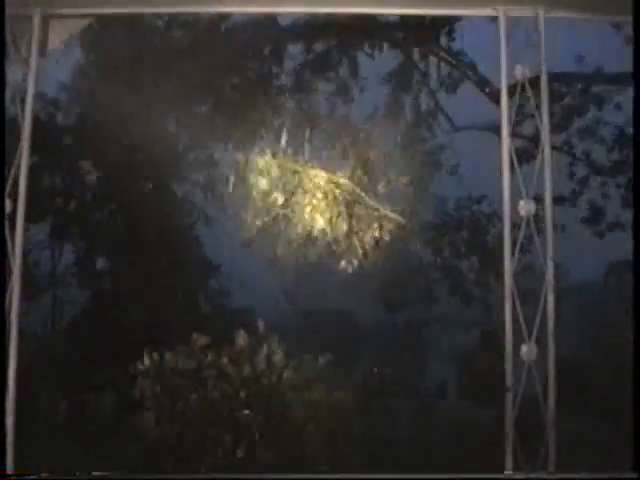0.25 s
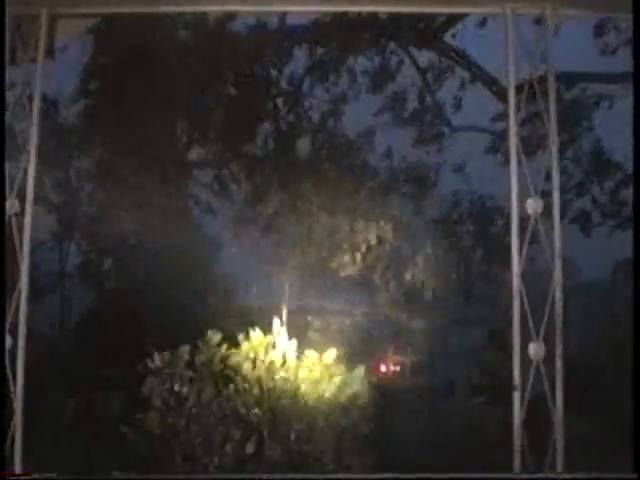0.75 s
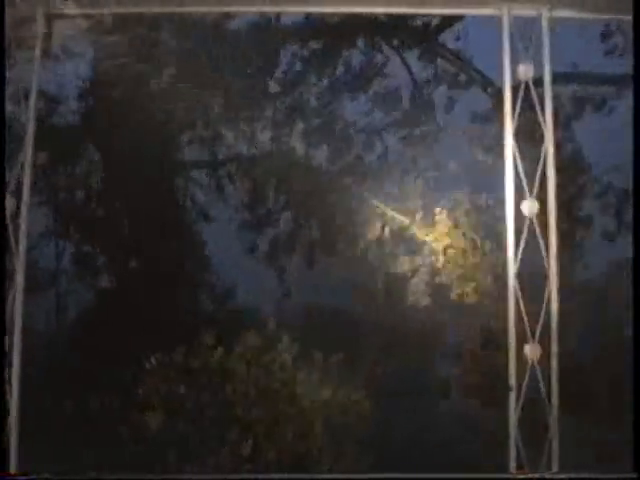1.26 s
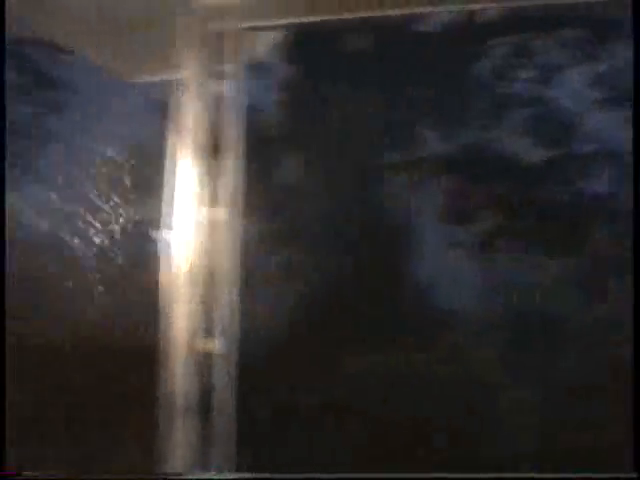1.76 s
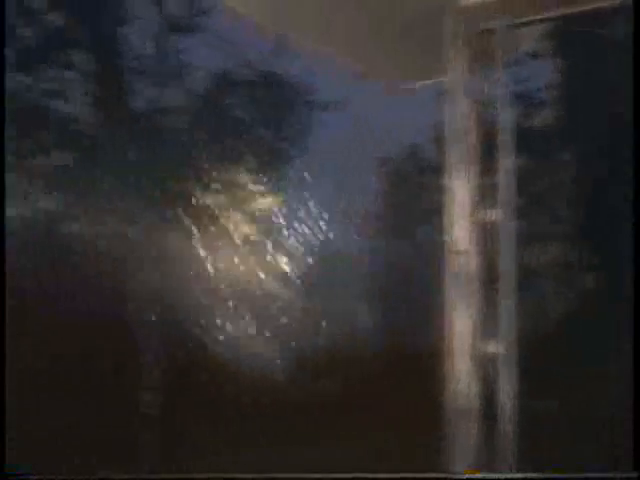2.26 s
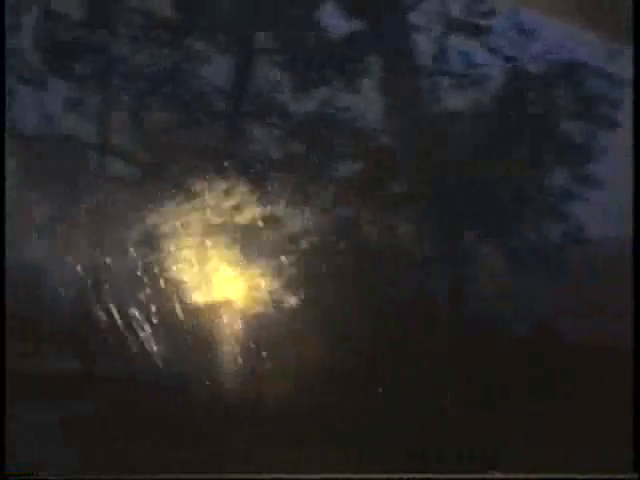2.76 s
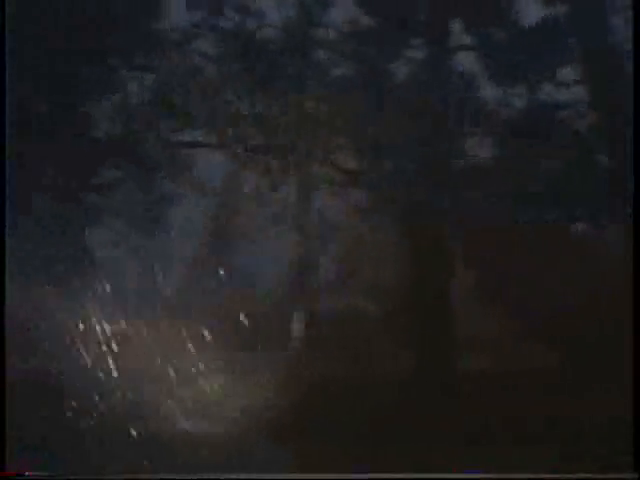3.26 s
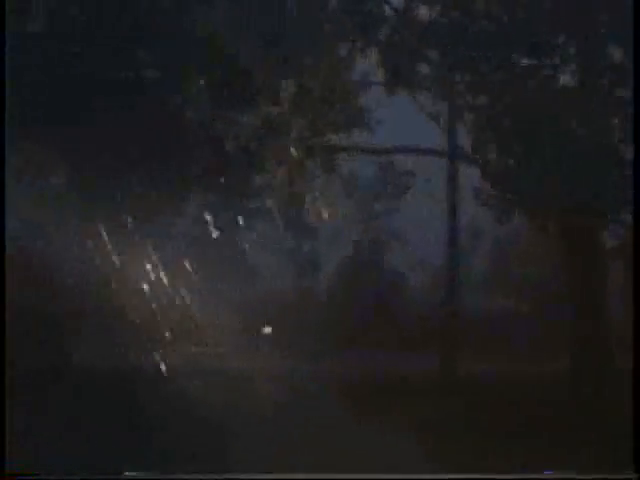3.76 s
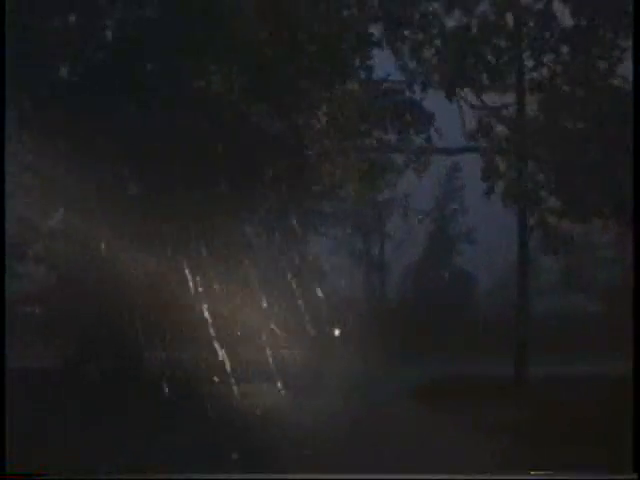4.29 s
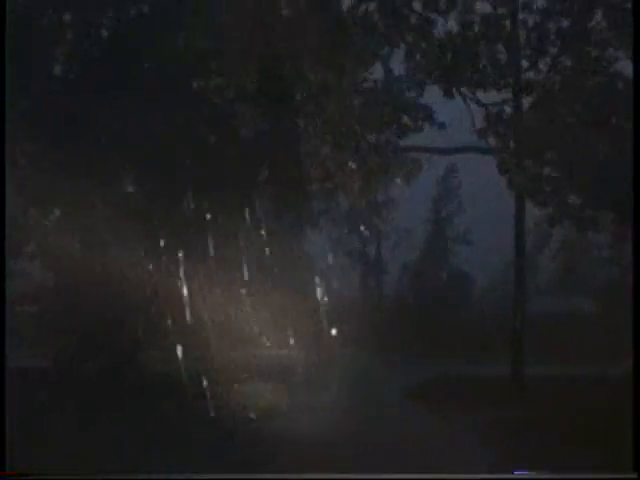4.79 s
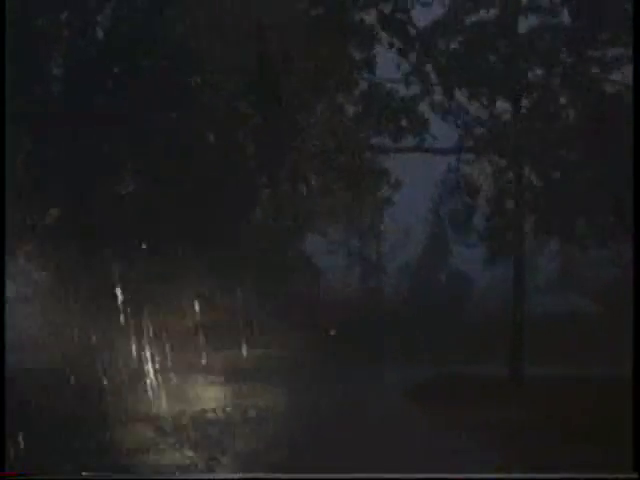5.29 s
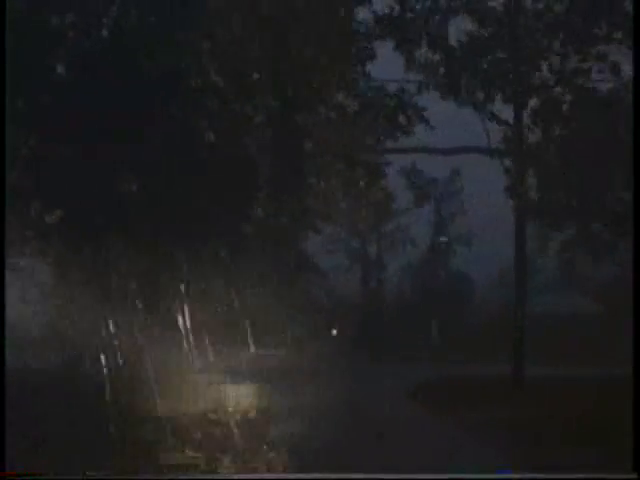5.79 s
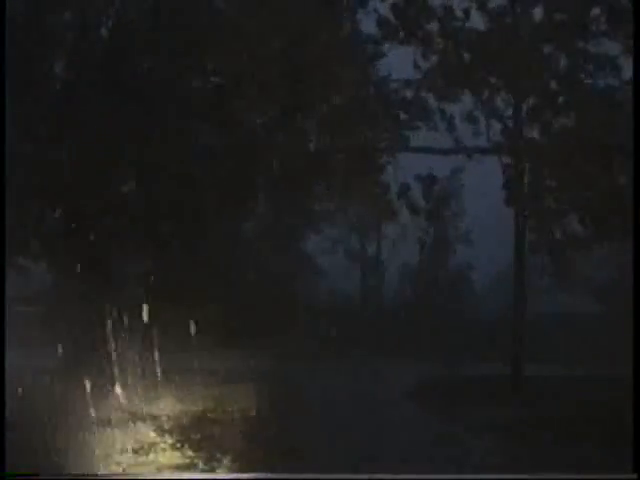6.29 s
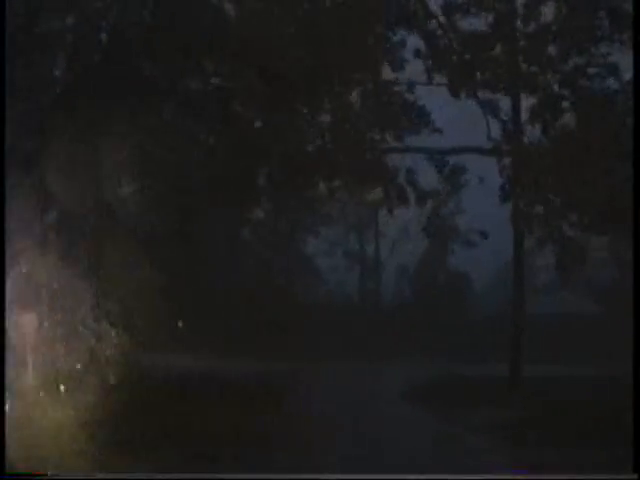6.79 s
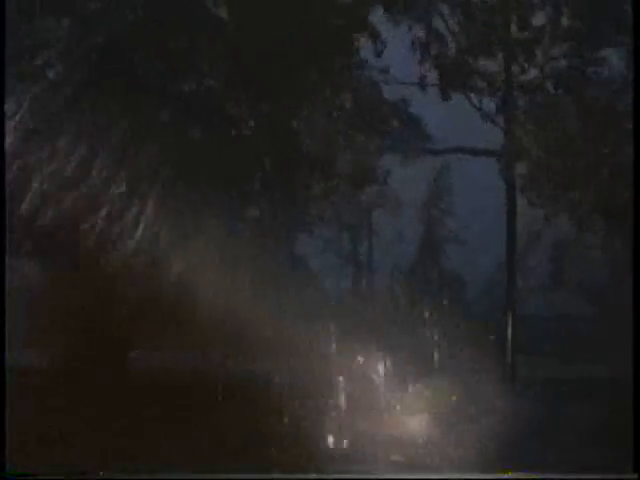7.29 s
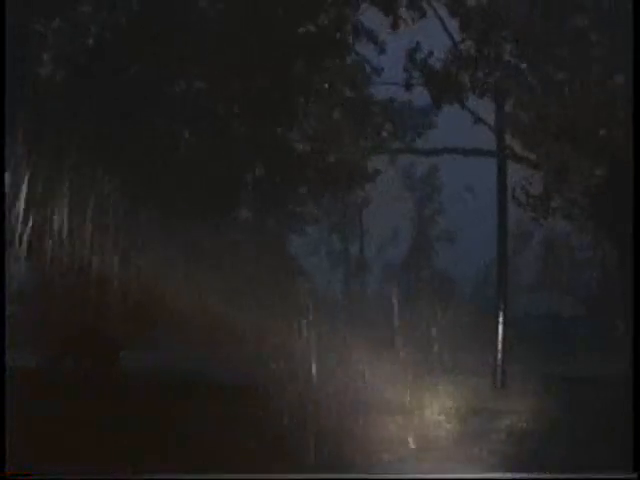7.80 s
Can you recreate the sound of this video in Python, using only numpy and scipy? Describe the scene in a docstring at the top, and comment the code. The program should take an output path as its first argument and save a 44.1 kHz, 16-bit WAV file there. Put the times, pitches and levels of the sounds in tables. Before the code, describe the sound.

Hurricane wind roars through trees while dense rain hisses steadily, with water spilling nearby, low wind thumps, one creak and two sharp drips.

```python
"""A hurricane at night, heard from under a porch roof that faces a yard and a road.
From the start wind roars and howls in the trees, leaves thrash, rain hisses and near drops spatter: all shaped noise,
but for ticking drops; eddies rumble and thump on two microphone ports. Early on, water spills from the roof edge.
The camera then creaks once, a sinking tone, as it turns to the road. The storm eases, two fat drips ring,
the level dips briefly three times, and wind and rain build again."""
import sys
import numpy as np
from scipy import signal
from scipy.fft import rfft, irfft, next_fast_len
from scipy.io import wavfile
from scipy.ndimage import uniform_filter1d, map_coordinates

SR = 44100
rng = np.random.default_rng(int(sys.argv[2]) if len(sys.argv) > 2 else 0)


def wav_out(sig):
    """Save sig, one row per channel (or a flat mono array), as 16-bit PCM at SR to the path in sys.argv[1]."""
    wavfile.write(sys.argv[1], SR, np.round(np.clip(np.atleast_2d(sig).T, -1, 1) * 32767).astype(np.int16))


N = 355005

# strength of the storm, which drives wind and rain alike: (time [s], level against full force [dB])
STORM_STRENGTH = [(0, -0.7), (.5, -0.15), (1.4, -0.04), (2.45, -0.1), (2.95, -0.5), (3.45, -0.45),
                  (3.7, -0.6), (4.25, -1.8), (4.6, -2), (5.2, -2.5), (5.72, -3), (5.95, -1.5), (6.4, -1.67),
                  (6.8, -1), (7.05, -0.5), (7.45, 0.13), (7.65, -0.5), (8.05, 0.44)]

# relative spectral density of each source: (frequency [Hz], level [dB per Hz])
ROAR_SPECTRUM = [(50, -16), (100, -9), (160, -2.3), (210, -2.5), (270, 1), (335, -1.5), (400, 0.4),
                 (470, -1.7), (540, -0.7), (700, -5), (1100, -15), (2500, -37), (6000, -69)]
LEAF_SPECTRUM = [(200, -33), (500, -6.5), (750, 0), (1000, 0.5), (1300, 0.5), (1800, -3.5), (2600, -8.5),
                 (4500, -22), (10000, -59)]
RAIN_SPECTRUM = [(500, -23), (1200, -10), (2000, -2.5), (2800, -1.5), (4000, -0.5), (5000, 0.5), (5700, 0),
                 (6400, -2.5), (7200, -5), (8100, -5.5), (8800, -10), (9500, -18), (10200, -26.5),
                 (11000, -77)]
DISTANT_SPECTRUM = [(15, -15), (35, -6), (65, -0.5), (100, -1.5), (160, 0.5), (250, -4), (400, -23),
                    (1200, -61)]
EDDY_SPECTRUM = [(10, -17), (22, -5), (40, -3), (65, 3), (100, -6), (140, 0), (200, -14), (320, -22),
                 (900, -69)]
SPLASH_SPECTRUM = [(700, -28), (1150, -11), (1400, 1), (1650, 3), (2000, 1), (2300, -12), (3500, -37)]

# correlation of each source between the two ports: (frequency [Hz], correlation [-1 to 1])
ROAR_CORRELATION = [(80, 0.93), (170, 0.53), (280, 0.52), (360, .33), (540, 0.68), (800, .1)]
LEAF_CORRELATION = [(750, -0.13), (1100, 0.055), (1700, 0.21)]
RAIN_CORRELATION = [(2000, 0.09), (4000, 0.13), (5200, 0.0047), (6000, -0.19), (6900, -0.4), (7900, -0.038),
                    (8900, -0.23), (9900, 0.061)]
DISTANT_CORRELATION = [(60, .85), (200, .65)]
EDDY_CORRELATION = [(50, -0.88)]
SPLASH_CORRELATION = [(1600, .3)]

# colour of the left port against the right: (frequency [Hz], left minus right [dB])
PORT_COLOUR = [(30, 7), (70, -1), (170, -3), (270, 0), (390, -3.5), (600, 0.5), (1100, -1), (1600, 0.1),
               (2500, -0.8), (4600, -2), (6000, -0.5), (7600, 1), (8400, -2.5), (9500, -10)]

# gusts that surge through the trees: (middle [s], length [s], rise [dB])
GUST_EVENTS = [(.3, 0.71, 0.5), (1.0, 0.137, 1), (2.02, .14, 1.5), (2.35, .3, .9), (2.92, .22, 0),
               (3.66, .18, 3.5), (4.0, 0.35, 1.5), (4.42, .4, 1), (4.95, .14, 1.5), (5.91, .16, 1),
               (6.72, .2, 0), (7.11, .14, 2), (7.46, .2, 1)]
# faint howls in the branches: (middle [s], length [s], level [dB], top pitch [Hz])
HOWL_EVENTS = [(.25, 0.603, -32.5, 450), (1.301, .6, -34.5, 551), (1.77, .16, -31, 585),
               (2.419, 0.398, -32, 551), (3.649, 0.217, -34, 541), (4.448, .55, -33, 551),
               (7.699, .5, -36.5, 579)]
# sheets of heavier rain that sweep past: (middle [s], length [s], rise [dB])
RAIN_SHEETS = [(.7, 0.15, 1.2), (1.25, .12, 0.7), (2.46, .26, 0.7), (3.57, 0.23, 1), (5.42, .14, 0.2),
               (6.22, .12, 0.1), (7.0, .16, 0.8), (7.5, .16, .9)]
# buffets of air that reach the ports: (middle [s], length [s], rise [dB])
BUFFET_EVENTS = [(.08, 0.44, 2.5), (2.33, .3, 4), (3.05, 0.7, 4), (3.66, .35, 2), (4.15, .6, 3),
                 (5.25, .25, 4), (5.95, .4, 1), (6.65, .6, 4.5)]
# single thumps of air on the ports: (middle [s], peak [dB], pitch at the middle [Hz])
THUMP_EVENTS = [(.085, -27, 65), (2.165, -18, 125), (2.31, -24, 80), (2.685, -22, 165), (2.937, -14, 68),
                (3.183, -19.5, 80), (3.66, -22, 55)]
# spills of water from the roof edge: (middle [s], length [s], level before panning [dB])
SPILL_EVENTS = [(.42, .2, -33), (.74, .4, -30), (1.059, .2, -27.5), (1.28, .16, -35)]
# fat drips that land close by: (start [s], peak [dB], pitch [Hz])
DRIP_EVENTS = [(4.7928, -15, 4300), (4.8002, -11, 4150)]
# brief dips in level: (start [s], depth [dB])
LEVEL_DIPS = [(5.545, 1.4), (6.335, 2.5), (7.59, 0.5)]

# level of each source at full force (dB), and the dB it moves for each dB of the storm
RAIN_DB, RAIN_GROWS = -17.5, 1.07
LEAF_DB, LEAF_GROWS = -23, 0.94
ROAR_DB, ROAR_GROWS = -24, 0.5
EDDY_DB, EDDY_GROWS = -34, .4
LEAF_GUST_SHARE = 0.22  # how much of a gust's rise the leaves take
HOWL_WIDTH_HZ, HOWL_BEND_OCTAVES = 90, .12
# the microphone swings from the yard to the road: middle and length of the turn (s)
TURN_S, TURN_LENGTH_S = 2.8, .6
# what the turn does to each source (dB), and the balance before and after it (left minus right, dB)
ROAD_ROAR_DB, ROAD_LEAF_DB, ROAD_EDDY_DB = -2, -0.8, -3
YARD_LEFT_DB, ROAD_LEFT_DB = 0.75, -0.4
# the creak: start and length (s), level of its main tone (dB), first and last pitch (Hz)
CREAK_S, CREAK_LENGTH_S = 2.661, .06
CREAK_DB, CREAK_FIRST_HZ, CREAK_LAST_HZ = -20, 436, 375
DIP_FALL_S = 0.017  # time to the bottom of a dip; it recovers a few times more slowly
TOP_HZ = 10700  # band limit


def amp(db):
    """Level: 20 dB is a tenfold ratio of amplitude."""
    return 10 ** (np.asarray(db) / 20)


def unit(x):
    """Normalisation: a signal divided by its root mean square has rms 1."""
    return x / np.sqrt(np.mean(x ** 2) + 1e-20)


def along(points, hz):
    """Logarithmic frequency scale: values between given points are interpolated in log frequency."""
    f, v = np.transpose(points)
    return np.interp(np.log(hz + 1), np.log(f + 1), v)


def curves(rows):
    """Linear interpolation: one value per sample for each column after the time."""
    s, *columns = np.transpose(rows)
    return [np.interp(np.arange(N) / SR, s, column) for column in columns]


def wobble(rate):
    """Slow random modulation: a smooth curve for each port through random knots, rate knots a second."""
    place = np.arange(N) * rate / SR
    knot_count = int(place[-1]) + 4
    return np.array([map_coordinates(rng.standard_normal(knot_count), [place]) for _ in range(2)])


def swells(rows):
    """Raised-cosine envelopes: levels in dB that surge and subside around their times."""
    t = np.arange(N) / SR
    return sum(db * np.cos(np.pi * np.clip((t - s) / length, -.5, .5)) ** 2 for s, length, db in rows)


def filtered(x, response):
    """Linear filtering: the spectrum of x is multiplied by a response that depends on frequency."""
    size = next_fast_len(N + SR // 2)
    hz = np.fft.rfftfreq(size, 1 / SR)
    return irfft(rfft(x, size) * response(hz), size)[..., :N]


def patchy_noise(depth_db):
    """Nonstationary noise: two white noises whose level drifts in patches about 500 Hz wide and .1 s long."""
    z = signal.stft(rng.standard_normal((2, N)), nperseg=512)[2]
    field = uniform_filter1d(rng.standard_normal(z.shape[1:]), size=6, axis=0)
    field = uniform_filter1d(field, size=18, axis=1)
    patchy = z * amp(depth_db * field / field.std())
    return signal.istft(patchy, nperseg=512)[1][:, :N]


def rush(spectrum, correlation, patchy_db, lead_ms=0):
    """Partial coherence: coloured stereo noise of rms 1, reaching the left port lead_ms earlier."""
    def mid_side(hz):
        # sum and difference of cos and sin parts have correlation cos(2 * angle)
        angle = np.arccos(np.clip(along(correlation, hz), -1, 1)) / 2
        return amp(along(spectrum, hz)) * [np.cos(angle), np.sin(angle)]

    mid, side = filtered(patchy_noise(patchy_db), mid_side)
    lag = lead_ms / 1000
    right = filtered(mid - side, lambda hz: np.exp(-2j * np.pi * hz * lag))
    return unit(np.array([mid + side, right]))


def trees(level_db):
    """Broadband flow noise: wind roars deeply through trunks and crowns, arriving from the left."""
    roar = rush(ROAR_SPECTRUM, ROAR_CORRELATION, patchy_db=0.76, lead_ms=0.37)
    return amp(level_db + 0.3 * wobble(rate=18)) * roar


def howls(left_share):
    """Vortex shedding: air leaving the branches hums as narrow-band noise whose pitch follows its strength."""
    t, out = np.arange(N) / SR, np.zeros(N)
    # two slow noises modulate a cosine and a sine into a narrow band around the pitch
    band = unit(filtered(rng.standard_normal((2, N)), lambda f: 1 / (1 + (2 * f / HOWL_WIDTH_HZ) ** 4)))
    for s, length, db, top_hz in HOWL_EVENTS:
        force = np.cos(np.pi * np.clip((t - s) / length, -.5, .5))
        hz = top_hz * 2 ** (HOWL_BEND_OCTAVES * (force - 1))
        phase = 2 * np.pi * np.cumsum(hz) / SR
        out += amp(db) * force * (band[0] * np.cos(phase) + band[1] * np.sin(phase))
    return np.outer([left_share, 1 - left_share], 2 * out)


def leaves(level_db):
    """Incoherent summation: wet foliage thrashes on both sides, each side surging on its own."""
    thrash = rush(LEAF_SPECTRUM, LEAF_CORRELATION, patchy_db=1.0)
    return amp(level_db + 0.25 * wobble(rate=3.16)) * thrash


def far_rain(level_db):
    """Superposition: countless drops over yard and road merge into a hiss, modelled as shaped noise."""
    hiss = rush(RAIN_SPECTRUM, RAIN_CORRELATION, patchy_db=0.72)
    return amp(level_db + 0.1 * wobble(rate=7)) * hiss


def near_drops(level_db, pitch_hz, cycles, scatter_db, gain_db, count):
    """Damped oscillation at random times: each drop is a short tick with its own size, pitch and direction."""
    when, where, size = rng.random((count, 3)).T
    hz = np.clip(pitch_hz * np.exp(0.45 * rng.standard_normal((count, 1))), 700, 8500)
    age = np.arange(128)  # samples since impact
    phase = hz * age / SR  # in cycles
    strength = amp(-scatter_db * np.log(np.maximum(1 - size, .01)))[:, None]
    ticks = strength * np.sin(2 * np.pi * phase) * np.exp(-phase / cycles)
    index = ((when * N).astype(int)[:, None] + age).ravel()
    sides = np.cos(where * np.pi / 2), np.sin(where * np.pi / 2)  # equal-power panning
    spatter = np.array([np.bincount(index, (ticks * side[:, None]).ravel(), N)[:N] for side in sides])
    return amp(level_db + gain_db) * unit(filtered(spatter, lambda f: amp(along(RAIN_SPECTRUM, f))))


def distant_storm(level_db):
    """Long-wave coherence: far-off wind is a steady low drone, much alike at both ports."""
    return amp(level_db) * rush(DISTANT_SPECTRUM, DISTANT_CORRELATION, patchy_db=0.5, lead_ms=0.53)


def eddies(level_db):
    """Turbulent pressure: lumps of air push on one port while they pull on the other."""
    lumps = amp(.9 * wobble(rate=9.8))
    return amp(level_db) * unit(lumps * rush(EDDY_SPECTRUM, EDDY_CORRELATION, patchy_db=0.0))


def thumps(length_s, fall_octaves, rough):
    """Pressure pulses: lumps of air slap the ports in opposite directions, sinking in pitch."""
    t, out = np.arange(N) / SR, np.zeros(N)
    unsteady = rough * wobble(rate=70)[0]
    for s, db, hz in THUMP_EVENTS:
        u = np.clip((t - s) / length_s, -.5, .5)
        phase = 2 * np.pi * np.cumsum(hz * 2 ** (-fall_octaves * u)) / SR
        out += amp(db) * np.cos(np.pi * u) ** 2 * np.sin(phase + unsteady)
    return np.outer([.8, -1], out)


def splashes(left_db, flutter_db):
    """Impact noise: water off the roof edge slops onto the ground on the left in a few ragged spills."""
    t = np.arange(N) / SR
    flow = sum(amp(db) * np.cos(np.pi * np.clip((t - s) / length, -.5, .5))
               for s, length, db in SPILL_EVENTS)
    flutter = amp(flutter_db * wobble(rate=70)[0])
    water = unit(flutter * rush(SPLASH_SPECTRUM, SPLASH_CORRELATION, patchy_db=0.5))
    return flow * water * amp(np.array([[.5], [-.5]]) * left_db)


def facing_road():
    """Rotation of the receiver: 0 while the microphone faces the yard, 1 once it has turned to the road."""
    progress = np.clip((np.arange(N) / SR - TURN_S) / TURN_LENGTH_S, -.5, .5)
    return .5 + .5 * np.sin(np.pi * progress)


def creak(rough, overtone_db):
    """Frictional slip: the grip slips on the camera body in one sinking groan, opposite at the two ports."""
    u = np.clip((np.arange(N) / SR - CREAK_S) / CREAK_LENGTH_S, 0, 1)
    hz = CREAK_FIRST_HZ + (CREAK_LAST_HZ - CREAK_FIRST_HZ) * u
    phase = 2 * np.pi * np.cumsum(hz) / SR + rough * wobble(rate=140)
    groan = np.sin(phase) + amp(overtone_db) * np.sin(2 * phase)
    envelope = np.sqrt(np.abs(np.sin(np.pi * u)))
    return amp(CREAK_DB) * envelope * groan * np.array([[1], [-1]])


def drips(attack_s, decay_s):
    """Impulsive excitation: a fat drip slaps a wet surface and rings as a damped sine for a few cycles."""
    out, t = np.zeros(N), np.arange(SR // 100) / SR
    shape = (1 - np.exp(-t / attack_s)) * np.exp(-t / decay_s)
    for s, db, hz in DRIP_EVENTS:
        out[round(s * SR):][:len(t)] += amp(db) * shape / shape.max() * np.sin(2 * np.pi * hz * t)
    return out


def dips():
    """Gain modulation: the level falls quickly and returns more slowly."""
    t = np.arange(N) / SR
    ages = [(np.maximum(t - s, 0) / DIP_FALL_S, db) for s, db in LEVEL_DIPS]
    return amp(-sum(db * age * np.exp(1 - age) for age, db in ages))


def scene():
    """Common driving force: wind and rain ease and build together; the trees fall back as the microphone turns."""
    storm_db, = curves(STORM_STRENGTH)
    road, gust_db = facing_road(), swells(GUST_EVENTS)
    roar_db = ROAR_DB + ROAR_GROWS * storm_db + ROAD_ROAR_DB * road + gust_db
    leaf_db = LEAF_DB + LEAF_GROWS * storm_db + ROAD_LEAF_DB * road + LEAF_GUST_SHARE * gust_db
    rain_db = RAIN_DB + RAIN_GROWS * storm_db + swells(RAIN_SHEETS)
    eddy_db = EDDY_DB + EDDY_GROWS * storm_db + ROAD_EDDY_DB * road + swells(BUFFET_EVENTS)
    left_db = YARD_LEFT_DB * (1 - road) + ROAD_LEFT_DB * road

    storm = trees(roar_db) + howls(left_share=.55) + leaves(leaf_db) + far_rain(rain_db)
    storm += near_drops(rain_db, pitch_hz=3590, cycles=1.7, scatter_db=3.0, gain_db=-12.5, count=12000)
    storm += splashes(left_db=6, flutter_db=2.5)
    close = eddies(eddy_db) + thumps(length_s=.06, fall_octaves=1.3, rough=.7)
    close += creak(rough=.3, overtone_db=-18) + drips(attack_s=.0005, decay_s=.0009)

    # the dips and the balance act on the storm around the porch only
    balanced = dips() * storm * amp(np.outer([.5, -.5], left_db))
    return balanced + distant_storm(level_db=-36.0) + close


def record(dry):
    """Frequency response: each port has its own colour; nothing passes above the band limit."""
    coloured = filtered(dry, lambda hz: amp(np.outer([.5, -.5], along(PORT_COLOUR, hz))))
    return filtered(coloured, lambda hz: hz < TOP_HZ)


dry = scene()
out = record(dry)
wav_out(out)
```